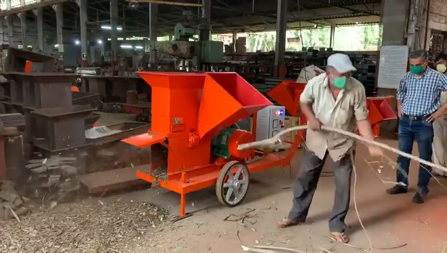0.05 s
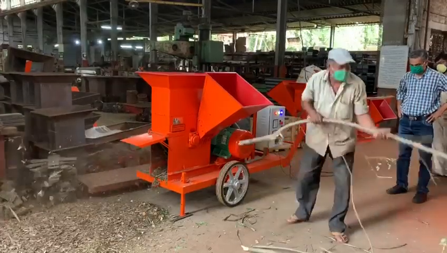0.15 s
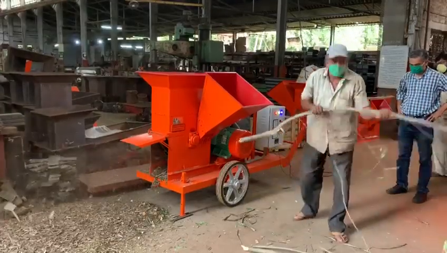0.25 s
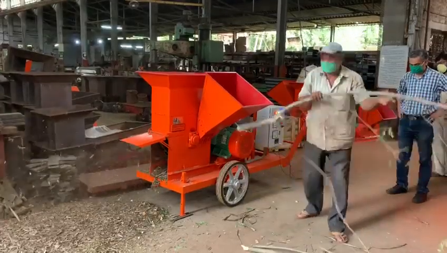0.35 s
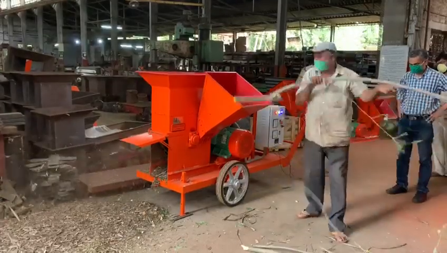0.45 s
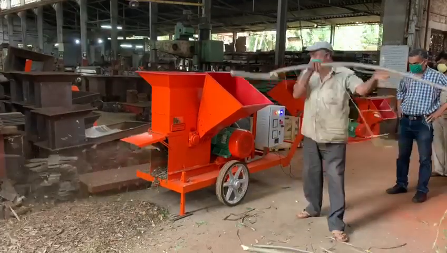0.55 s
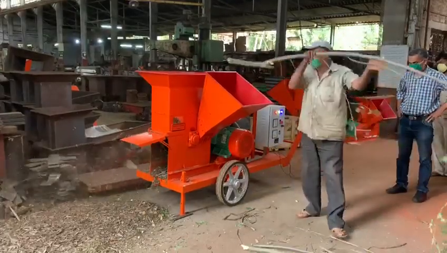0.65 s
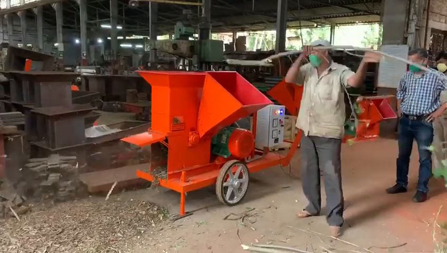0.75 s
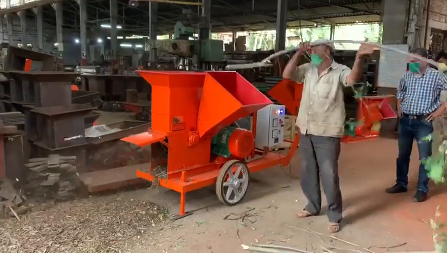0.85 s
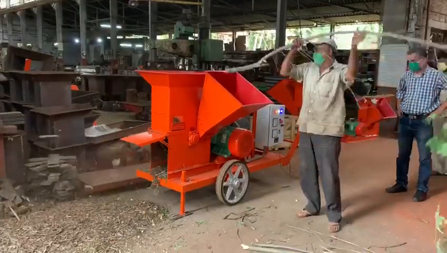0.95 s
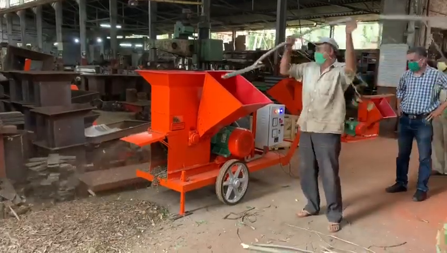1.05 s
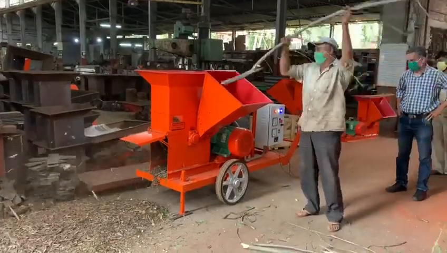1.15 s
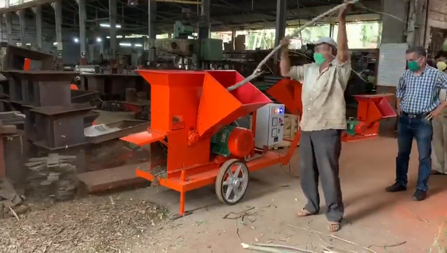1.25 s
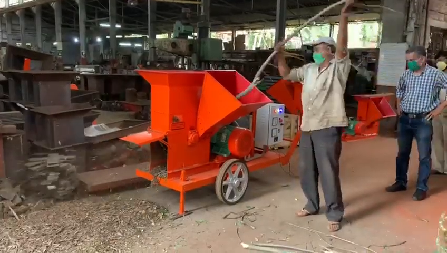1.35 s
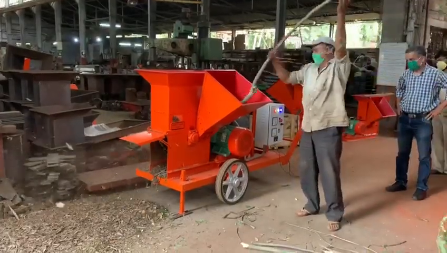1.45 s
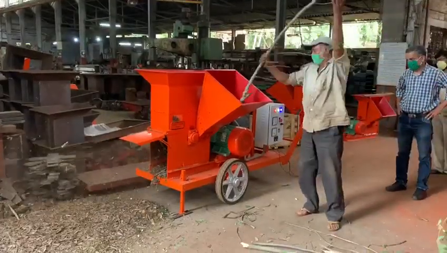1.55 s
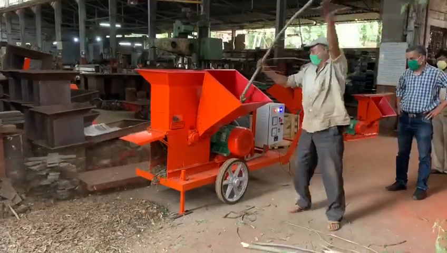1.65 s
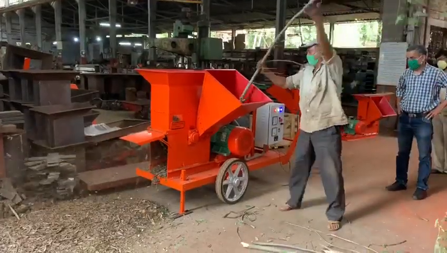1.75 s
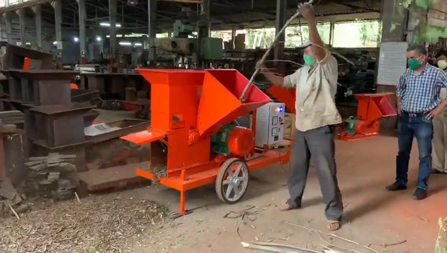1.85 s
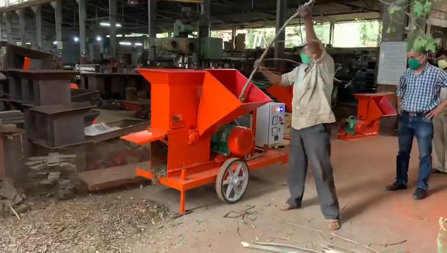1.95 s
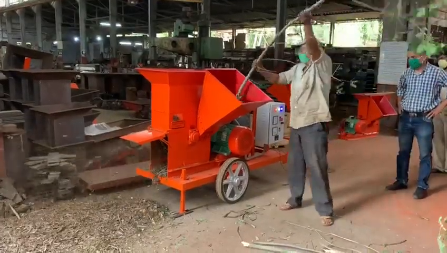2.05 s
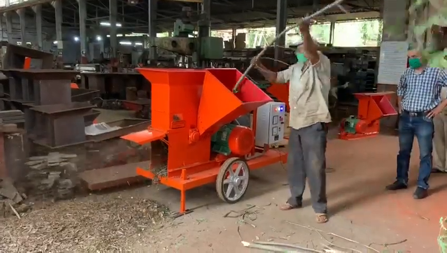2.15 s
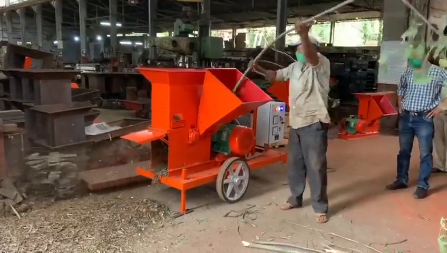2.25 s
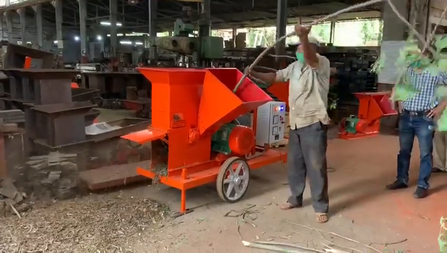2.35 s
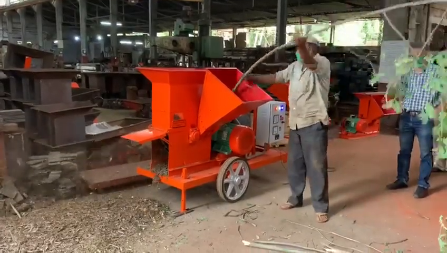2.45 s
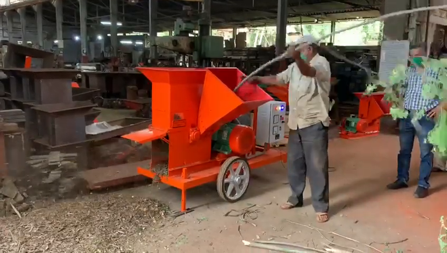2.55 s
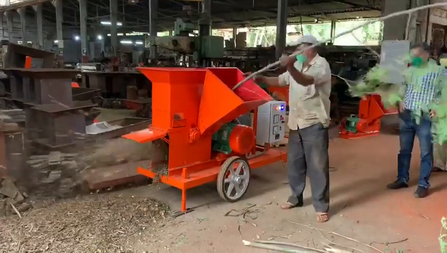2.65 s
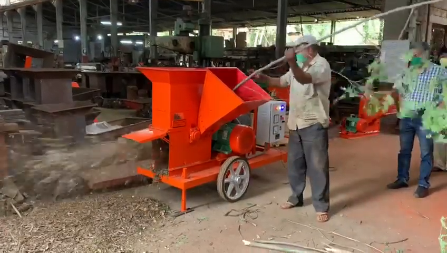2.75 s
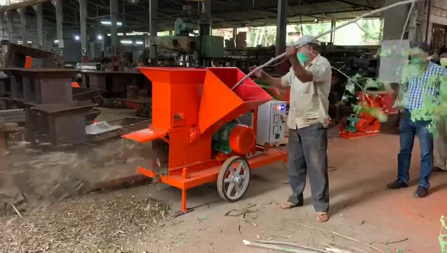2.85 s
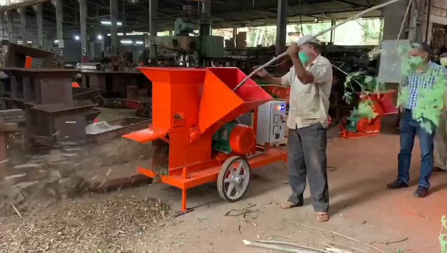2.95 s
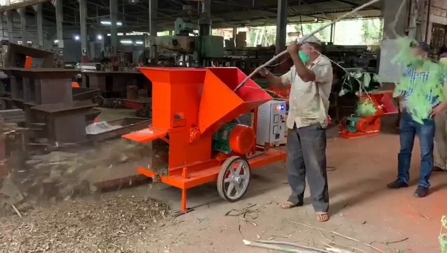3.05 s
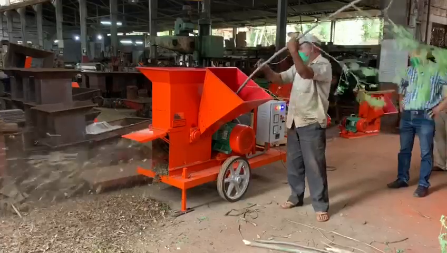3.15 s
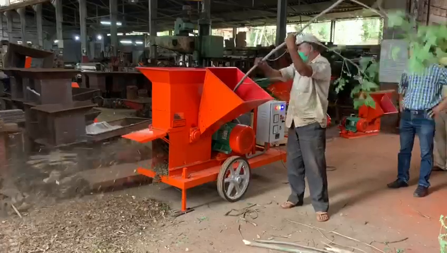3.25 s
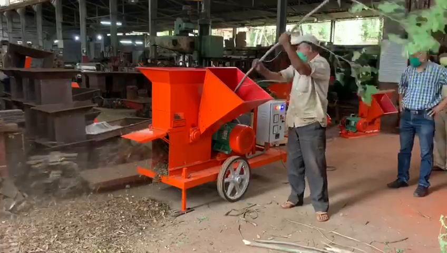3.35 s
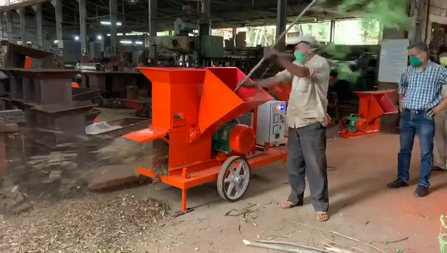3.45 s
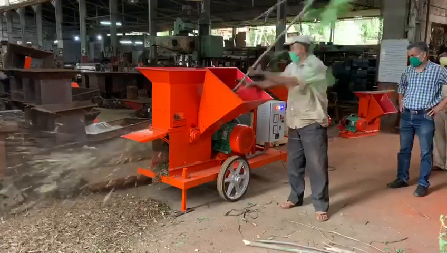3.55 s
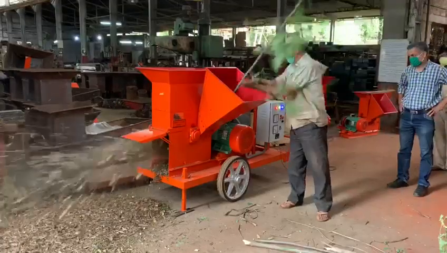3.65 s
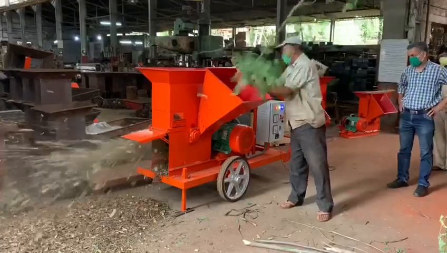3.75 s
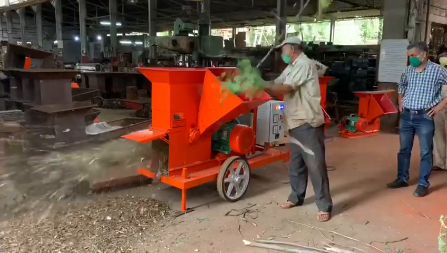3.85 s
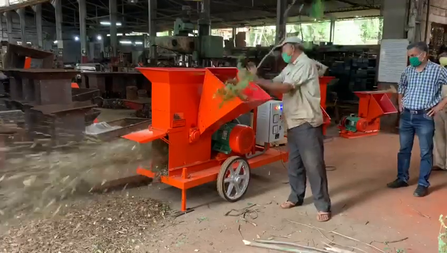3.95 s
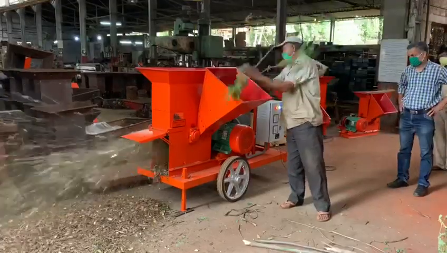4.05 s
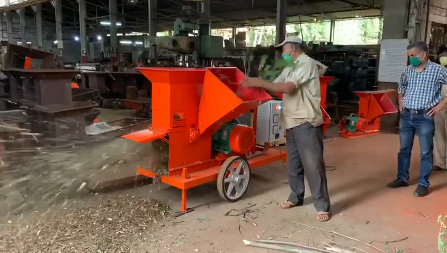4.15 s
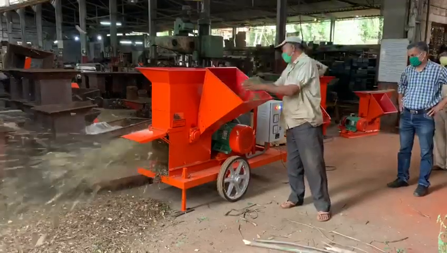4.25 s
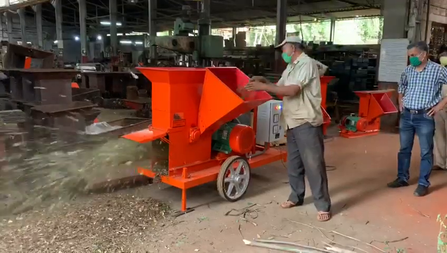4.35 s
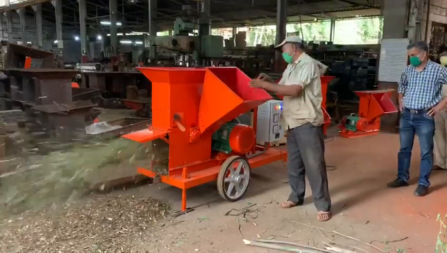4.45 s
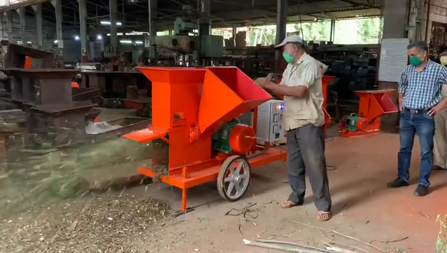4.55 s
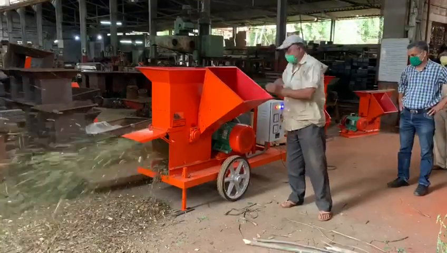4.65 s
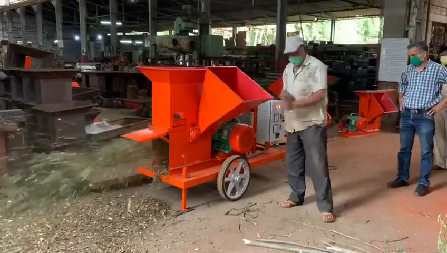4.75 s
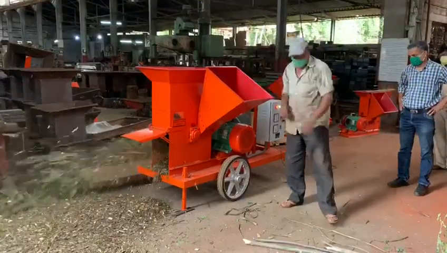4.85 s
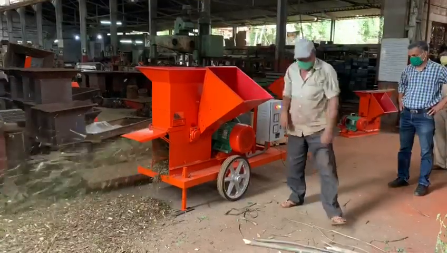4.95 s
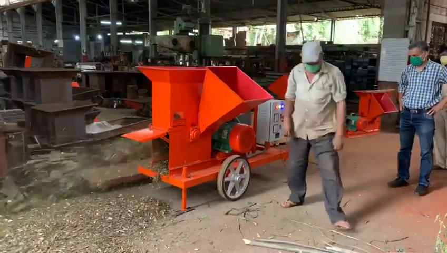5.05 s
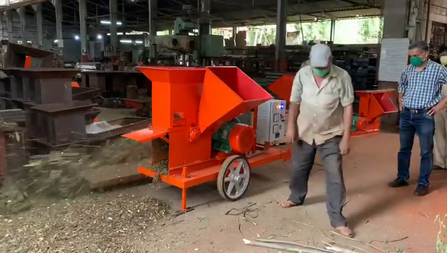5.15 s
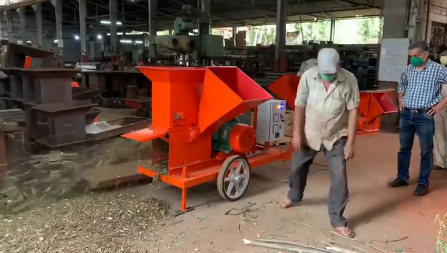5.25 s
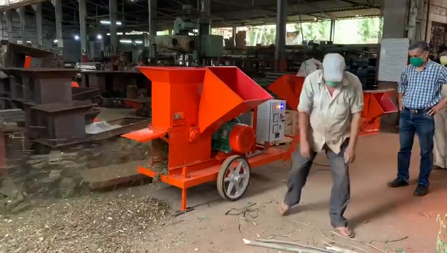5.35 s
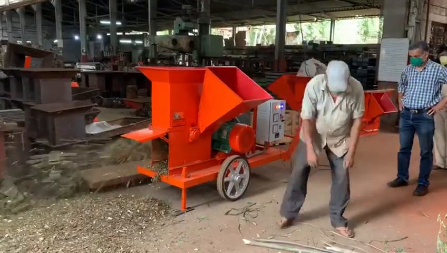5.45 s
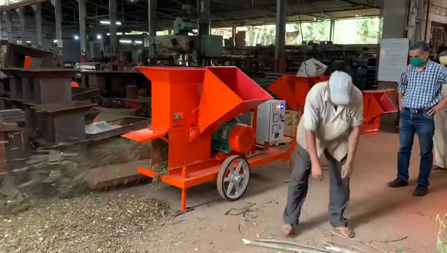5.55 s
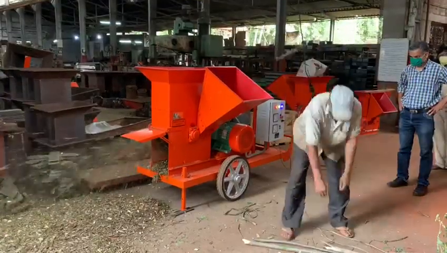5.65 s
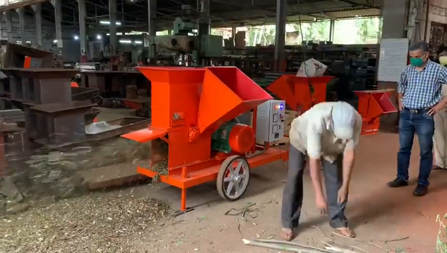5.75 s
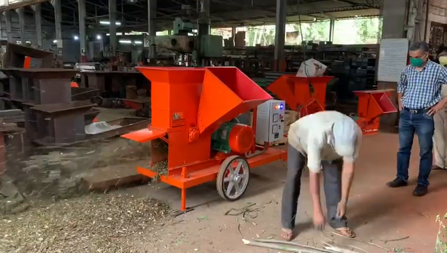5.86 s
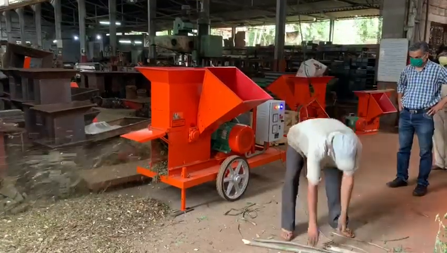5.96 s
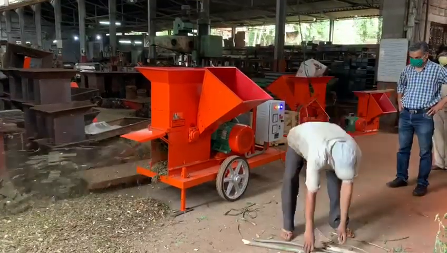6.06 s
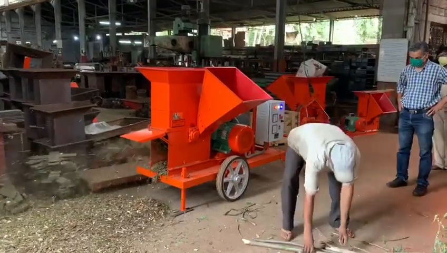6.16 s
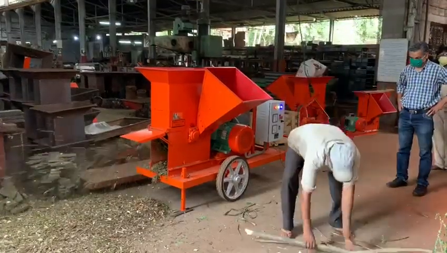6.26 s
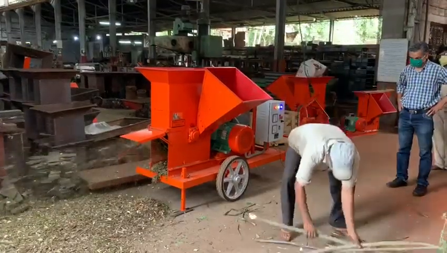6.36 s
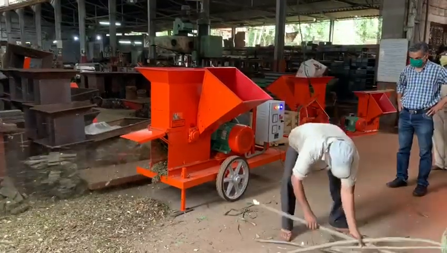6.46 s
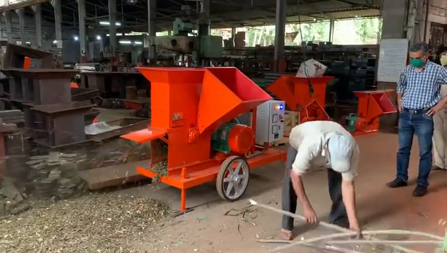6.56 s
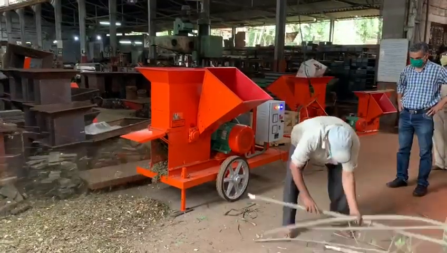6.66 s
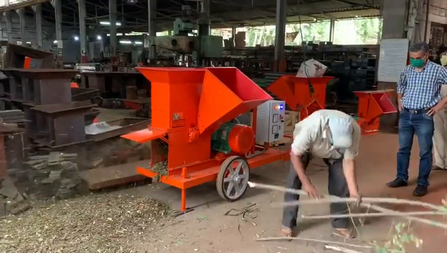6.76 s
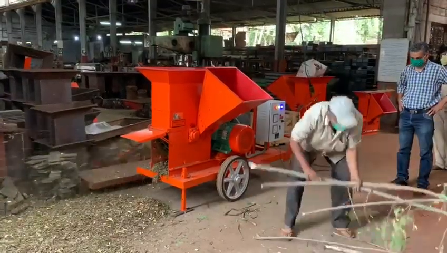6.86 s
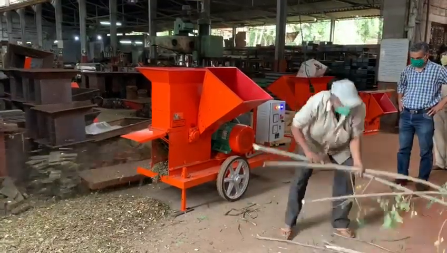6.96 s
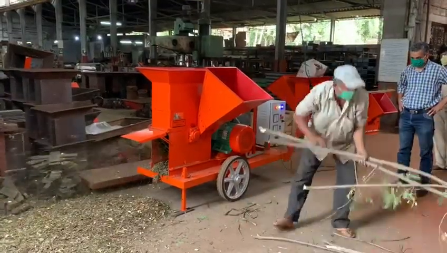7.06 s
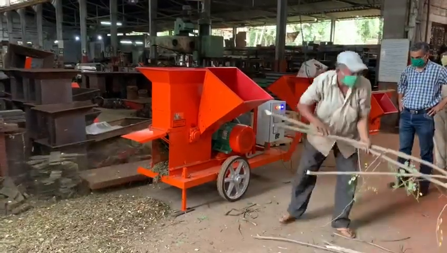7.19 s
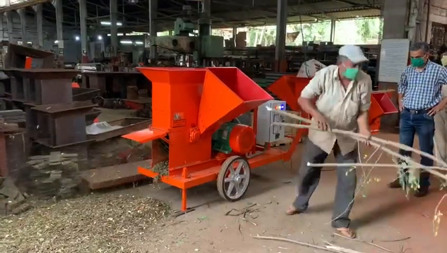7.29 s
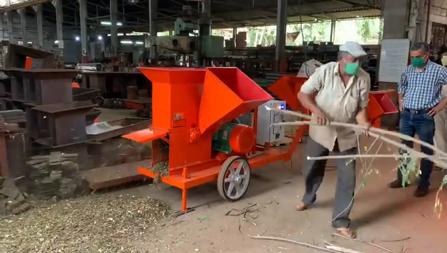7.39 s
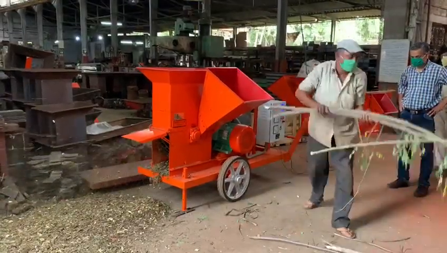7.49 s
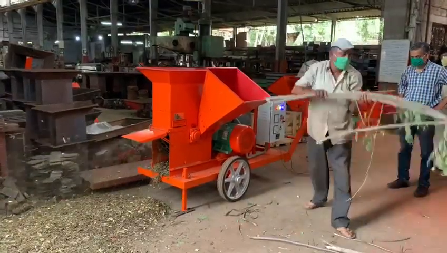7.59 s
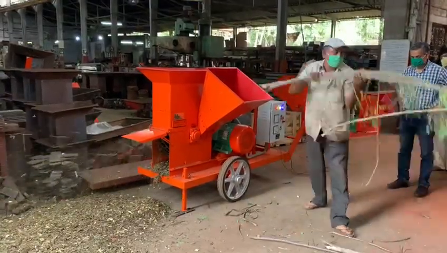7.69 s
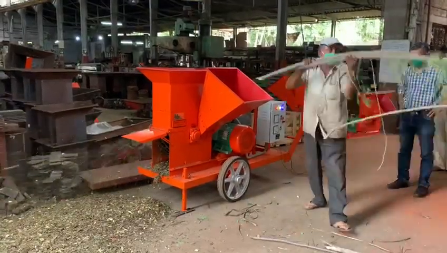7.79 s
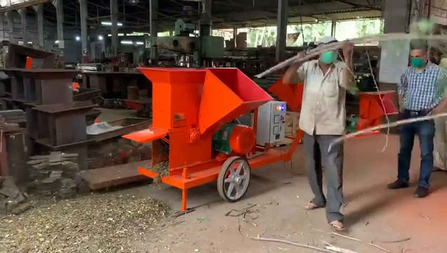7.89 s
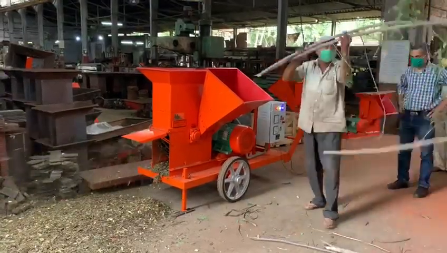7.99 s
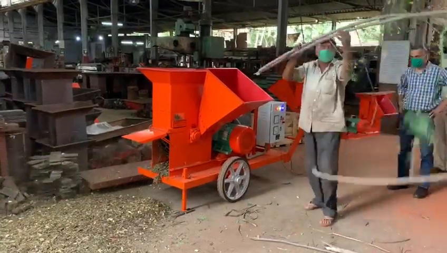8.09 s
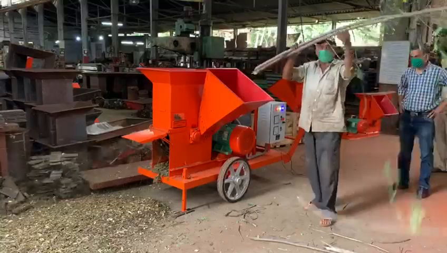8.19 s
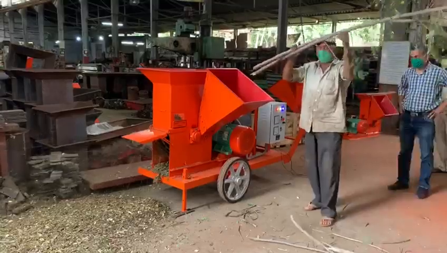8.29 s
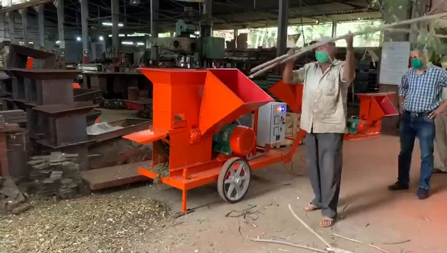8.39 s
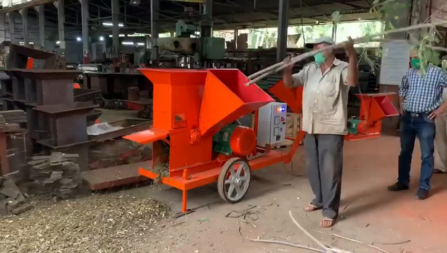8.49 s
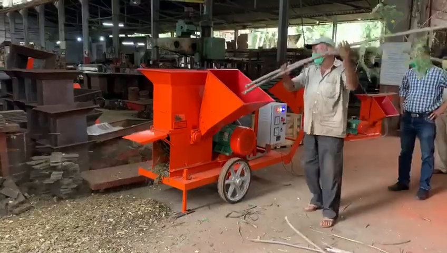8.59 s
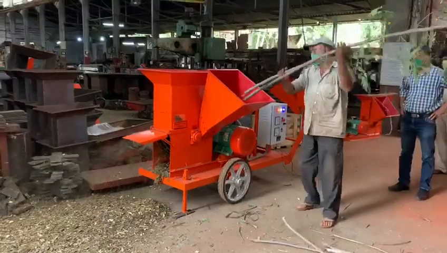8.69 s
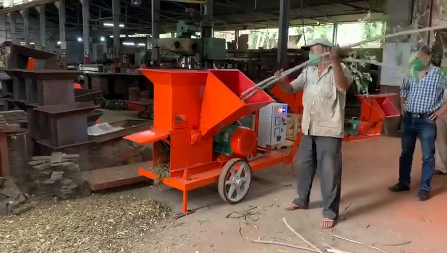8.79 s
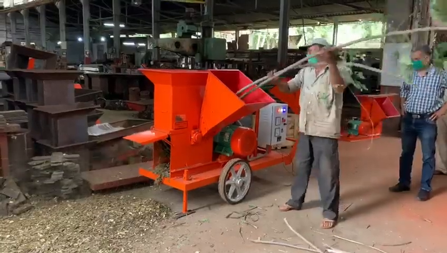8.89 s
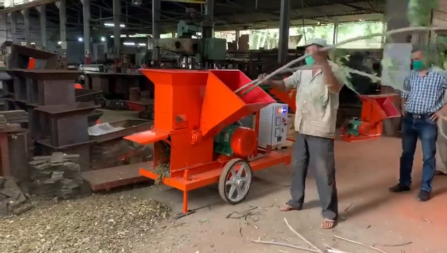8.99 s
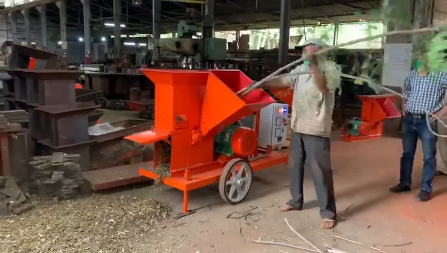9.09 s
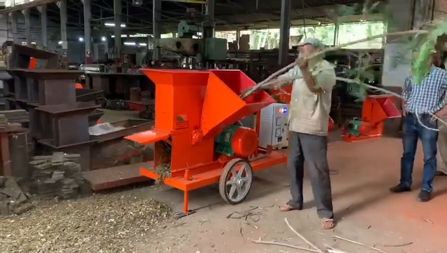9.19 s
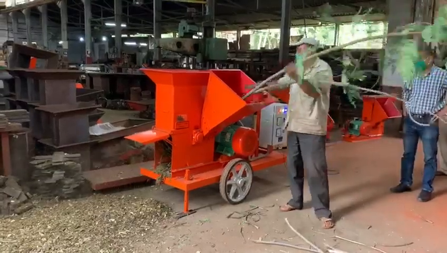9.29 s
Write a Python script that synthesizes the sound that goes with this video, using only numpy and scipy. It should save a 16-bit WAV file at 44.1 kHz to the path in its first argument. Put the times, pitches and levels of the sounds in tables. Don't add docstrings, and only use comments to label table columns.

```python
import sys
import numpy as np
from scipy import signal
from scipy.fft import rfft, irfft, next_fast_len
from scipy.io import wavfile
from scipy.ndimage import uniform_filter1d, map_coordinates

SR = 44100
rng = np.random.default_rng(int(sys.argv[2]) if len(sys.argv) > 2 else 0)


def store_wav(level_fs):
    pcm = np.round(np.clip(np.atleast_2d(level_fs), -1, 1) * 32767)
    wavfile.write(sys.argv[1], SR, pcm.T.astype(np.int16))


def to_linear_factor(level_db):
    exponent = np.asarray(level_db, float) / 20
    return 10 ** exponent


N = 411453
IDLE_HZ = 115.7

# (time [s], rate [Hz])
KNIFE_RATE = [(2.5, 115.72), (2.7, 114.71), (2.82, 113.32), (2.94, 114.45), (3.18, 115.17), (3.42, 115.61),
              (3.54, 114.07), (3.66, 112.96), (3.85, 112.86), (4.14, 113.45), (4.26, 113.85), (4.62, 114.5),
              (4.86, 115.25), (5.1, 115.55), (5.4, 115.63), (8.4, 115.77)]
# (shaft order [1], idling level [dB], loaded level [dB], left over right [dB], right lead [rad])
LOW_ORDERS = [(2, -26, -31, 0, 0), (4, 0, -1.5, 2, .1), (5, -9.5, -6, 0, 0), (7, -19, -17, 1, .1),
              (8, -1, -14, 3, .2), (10, -20, -11, -2, -.3), (12, -13, -6, 0, -1.5),
              (14, -11, -26, -10, -.9), (16, -6, -14, -5, .3), (17, -21, -26, 1, .2),
              (18, -22, -29, 1, -.6), (20, -7, -11, 7, 1.7), (24, -10, -5, 6, 2.2), (25, -23, -18, 1, .4),
              (28, -13, -11, -9, -.4), (32, -17, -4, -1, -1.5)]
# (shaft order [1], idling level [dB], loaded level [dB], left over right [dB], right lead [rad])
HIGH_ORDERS = [(36, -6, -18, -2, .6), (40, -19, -16, -4, -2.4), (44, -12, -24, -2, .7),
               (45, -25, -21, -3, .1), (48, -20, -22, -3, .4), (52, -12, -22, 6, -1.5),
               (56, -14, -18, -3, 2.2), (60, -17, -28, 4, -1), (64, -15, -23, -2, -2.9),
               (68, -18, -23, -3, -1.8), (76, -17, -29, -3, 2.3), (88, -24, -27, 1, -.6),
               (92, -17, -28, 0, -.8), (96, -26, -26, 0, -.5), (108, -23, -29, -2, -.7),
               (112, -20, -29, -1, -2), (128, -26, -28, 1, -1.7), (144, -28, -31, -1, -1.8)]
# (time [s], hum [dB], chip flow in the chute [dB])
MACHINE_LEVELS = [(0.0, -29.5, -42), (0.25, -29, -36.5), (0.7, -28, -41), (2.0, -27, -34.5),
                  (2.55, -26.5, -36), (2.75, -29, -36.5), (3.09, -27.5, -34.5), (3.46, -30, -34.5),
                  (4.03, -30.5, -39.5), (4.34, -31.5, -41), (4.68, -30.5, -41), (5.02, -30, -38),
                  (5.33, -32, -38), (5.61, -30, -34.5), (6.0, -30, -36.5), (7.5, -28.5, -36),
                  (8.0, -28, -38.5), (9.33, -27.5, -38.5)]


def unit(x):
    return x / np.sqrt(np.mean(x ** 2) + 1e-20)


def along(points, hz):
    f, v = np.transpose(points)
    return np.interp(np.log(hz + 1), np.log(f + 1), v)


def curves(rows, outside=None):
    s, *cols = np.transpose(rows)
    return [np.interp(np.arange(N) / SR, s, c, outside, outside) for c in cols]


def wobble(rate):
    return map_coordinates(rng.standard_normal(int(N * rate / SR) + 4), [np.arange(N) * rate / SR])


def filtered(x, response):
    m = next_fast_len(N + 8192)
    return irfft(rfft(x, m) * response(np.fft.rfftfreq(m, 1 / SR)), m)[..., :N]


def coloured(x, points):
    return unit(filtered(x, lambda hz: to_linear_factor(along(points, hz))))


def resonances(modes):
    def response(f):
        total = 0
        for k, (centre, width, db) in enumerate(modes):
            damping = 1j * f * width
            total = total + (-1) ** k * to_linear_factor(db) * damping / (centre ** 2 - f * f + damping)
        return total
    return response


def noise(patchy_db):
    z = signal.stft(rng.standard_normal((2, N)), nperseg=512)[2]
    field = uniform_filter1d(rng.standard_normal(z.shape[1:]), size=6, axis=0)
    field = uniform_filter1d(field, size=10, axis=1)
    return unit(signal.istft(z * to_linear_factor(patchy_db * unit(field)), nperseg=512)[1][:, :N])


def grit(rate, spread_db, t60):
    hits = (rng.random(N) < rate / SR) * to_linear_factor(spread_db * rng.standard_exponential(N))
    return unit(signal.lfilter([1], [1, -to_linear_factor(-60 / (t60 * SR))], hits))


def swell(s, db, length, attack, t60, fading=0):
    t = np.arange(N) / SR - s
    held = np.clip(t - attack, 0, length)
    released = np.clip(t - attack - length, 0, 2)
    return np.clip(t / attack, 0, 1) * to_linear_factor(db - fading * held - 60 * released / t60)


def knife_phase():
    return 2 * np.pi * np.cumsum(curves(KNIFE_RATE)[0]) / SR


def speed_lost():
    return IDLE_HZ - curves(KNIFE_RATE)[0]


def rotor():
    sag_from_hz, sag_over_hz = 2, 2
    sag = speed_lost()
    shaft = knife_phase() / 4
    out = np.zeros((2, N))
    for order, idle_db, loaded_db, pan_db, lead in LOW_ORDERS + HIGH_ORDERS:
        tone_sag = sag * (order if order > 7 else 16) / 4
        load = np.clip((tone_sag - sag_from_hz) / sag_over_hz, 0, 1)
        unsteady = min(order / 55, .9)
        flutter_db = unsteady * (1.1 * wobble(4) + 2.4 * wobble(18))
        size = to_linear_factor(idle_db + load * (loaded_db - idle_db) + flutter_db)
        phase = order * shaft + rng.uniform(0, 2 * np.pi) + .5 * unsteady * wobble(12)
        sides = to_linear_factor([pan_db / 2, -pan_db / 2])
        tone = np.array([sides[0] * np.sin(phase), sides[1] * np.sin(phase + lead)])
        out += size * tone / np.sqrt(np.mean(sides ** 2) / 2)
    return out * to_linear_factor(curves(MACHINE_LEVELS)[0] + 0.05)


def revolution():
    even_db, knife_db, scatter_db, loaded_db = 4, 4, 4, -6
    # (frequency [Hz], level [dB])
    comb_colour = [(700, -45), (1500, -31), (3000, -32), (4500, -36), (6500, -39), (7500, -60)]
    k = np.arange(2049)
    db = along(comb_colour, k * IDLE_HZ / 4) + even_db * (k % 2 == 0) + knife_db * (k % 4 == 0)
    db = db + scatter_db * rng.standard_normal(len(k))
    db[[round(row[0]) for row in LOW_ORDERS + HIGH_ORDERS]] = -120
    spectrum = to_linear_factor(db) * np.exp(2j * np.pi * rng.random((2, len(k))))
    turns = irfft(spectrum) * 4096 / np.sqrt(2)
    place = (knife_phase() / (8 * np.pi) + .0004 * wobble(9)) % 1 * 4096
    pair = np.array([np.interp(place, np.arange(4096), turn) for turn in turns])
    return pair * to_linear_factor(curves(MACHINE_LEVELS)[0] + loaded_db * np.clip(speed_lost(), 0, 1))


def air():
    # (frequency [Hz], density [dB/Hz])
    draught_colour = [(20, -21), (45, -12.5), (100, -4.5), (250, 1.5), (450, -4.5), (1000, -7), (1700, -11),
                      (2500, -10.5), (4000, -12.5), (6000, -23.5), (12500, -62)]
    # (frequency [Hz], density [dB/Hz])
    hiss_colour = [(200, -51), (1500, -35), (4000, 2), (5500, -2), (7000, 0), (9000, 2.3), (12500, -4)]
    hum_db, hiss_db = curves(MACHINE_LEVELS)
    throb = 1 + 0.26 * np.cos(knife_phase())
    roar = coloured(throb * noise(patchy_db=1.06), draught_colour)
    rumble = filtered(roar, lambda hz: 1 / (1 + (hz / 70) ** 4))
    faded_db = -6 * np.clip(speed_lost(), 0, 1)
    roar = roar + rumble * (to_linear_factor(faded_db) - 1)
    trickle = 0.63 + 0.34 * grit(rate=87, spread_db=3.5, t60=0.11)
    hiss = coloured(trickle * noise(patchy_db=.7), hiss_colour)
    roar_gain = to_linear_factor(hum_db - 1.0 + 0.084 * wobble(1.9))
    hiss_gain = to_linear_factor(hiss_db + 3.0 + 0.59 * wobble(9.3))
    return roar_gain * roar + hiss_gain * hiss


def casing(x):
    # (centre [Hz], width [Hz], lift [dB])
    housing_bands = [(1908, 65, -5), (3290, 65, -5), (4040, 50, -7), (4683, 50, -6), (5130, 230, -2.5),
                     (5460, 96, 3), (5830, 150, -3.5), (6180, 73, 4.5)]
    return filtered(x, lambda f: to_linear_factor(sum(db * np.exp(-((f - hz) / width) ** 2) for hz, width, db in housing_bands)))


def wood():
    attack_s, t60_s = 0.019, 0.21
    # (time [s], force [dB], blows over splinters [dB])
    feed = [
        (2.58, -27.5, -6),
        (2.8, -31, 4.5),
        (3.0, -33.5, 2.5),
        (3.4, -38.5, 0),
        (3.5, -30.5, -8),
        (3.8, -28, -1),
        (4.15, -28.5, -4.5),
        (4.65, -33, -4.5),
        (4.85, -37, -2),
    ]
    # (time [s], force [dB], held [s], blows over splinters [dB], hopper over anvil [dB])
    bites = [(2.62, -29.5, .025, 15, -15), (2.678, -27.5, 0.01, -11.5, -2.5), (2.712, -31, 0.03, 4.5, 5.5),
             (2.838, -41, 0.03, -7.5, -6), (3.136, -45, 0.0063, 6, 7), (3.17, -57, .01, 9, 1),
             (3.448, -25, 0.078, -5.5, -3), (3.529, -31, 0.024, 3, 0.5), (3.611, -30.5, 0.058, -7, -2),
             (3.7, -44, 0.015, 3, 2), (3.95, -51, .04, -14, 12), (4.311, -38.5, .02, 0, -10),
             (4.5, -36.5, 0.038, -11, -12), (4.56, -42, 0.027, -7, -10), (4.663, -42, 0.016, -19, 0),
             (4.918, -35, 0.016, -7, -3), (5.07, -46, 0.026, -18, 0)]
    force_db, blows_db = curves(feed, outside=-85)
    splinter = to_linear_factor(force_db)
    anvil = to_linear_factor(force_db + blows_db)
    hopper = anvil * to_linear_factor(-6.5)
    for s, db, held, over_db, hopper_db in bites:
        grab = swell(s, db, held, attack_s, t60_s)
        splinter = splinter + grab
        anvil = anvil + grab * to_linear_factor(over_db)
        hopper = hopper + grab * to_linear_factor(over_db + hopper_db)
    return hopper, anvil, splinter


def branch():
    # (centre [Hz], width [Hz], level [dB])
    hopper_modes = [(311, 170, 0.5), (387, 57, 2)]
    # (centre [Hz], width [Hz], level [dB])
    anvil_modes = [(470, 130, 0), (915, 160, 1), (1430, 250, -13)]
    # (frequency [Hz], density [dB/Hz])
    crunch_colour = [(60, -45), (500, -12.5), (1000, -3), (1800, -3.5), (2600, 1.5), (3600, -7),
                     (6000, -23)]
    # (frequency [Hz], density [dB/Hz])
    spray_colour = [(200, -56), (1800, -23.5), (3200, 1), (4500, -1.5), (6000, -4), (9000, -4.5),
                    (12500, -7)]
    hopper, anvil, splinter = wood()
    turns = knife_phase() / (2 * np.pi)
    strength = to_linear_factor(2.3 * rng.standard_normal(int(turns[-1]) + 1))[turns.astype(int)]
    bite = strength * np.exp(-3 * (turns % 1))
    boom = unit(filtered((0.36 + bite) * noise(patchy_db=2.0), resonances(hopper_modes)))
    knock = unit(filtered((1.5 + bite) * noise(patchy_db=4.0), resonances(anvil_modes)))
    blows = unit(filtered(bite, resonances(anvil_modes)))
    knock = unit(knock + .9 * blows * [[1], [.3]])
    splinters = .7 + 0.42 * bite + 0.23 * grit(rate=840, spread_db=3.5, t60=0.028)
    crunch = coloured(splinters * noise(patchy_db=1.5), crunch_colour)
    spray = coloured(splinters * noise(patchy_db=1.5), spray_colour)
    thumps = filtered(hopper * boom + anvil * knock, lambda hz: hz ** 4 / (hz ** 4 + 130 ** 4))
    return thumps + splinter * to_linear_factor(1.5) * (crunch + to_linear_factor(1.5) * spray)


def slide():
    attack_s, t60_s = 0.028, 0.33
    # (time [s], level [dB], length [s])
    scrapes = [
        (1.45, -38, 1.5),
        (1.453, -26, 0.022),
        (1.539, -18, 0.011),
        (1.686, -26, 0.0091),
        (1.786, -20.5, 0.023),
        (2.506, -23.5, 0.046),
        (3.11, -27.5, 0.39),
        (4.553, -35, .1),
        (4.659, -19.5, 0.042),
    ]
    bark = unit(filtered(noise(patchy_db=3.0), resonances([(1638, 600, 0.0), (3150, 3300, -5.5)])))
    return to_linear_factor(-8.0) * sum(swell(*row, attack_s, t60_s) for row in scrapes) * bark


def chips():
    fall_ms, rise_ms = 14, 3
    # (time [s], peak level [dB])
    strikes = [(0.357, -16), (1.3474, -15.5), (1.6719, -13), (1.9694, -20), (2.5296, -18.5), (2.6299, -25),
               (3.0116, -23), (3.1014, -22), (3.137, -14), (3.2605, -21), (3.3323, -19.5), (3.355, -14.5),
               (3.467, -18), (3.6124, -14), (4.1071, -18), (4.1639, -28), (4.2752, -19), (4.5236, -11.5),
               (5.072, -19), (5.462, -14.5), (5.7387, -20), (6.191, -21), (6.8184, -20), (6.838, -21),
               (7.06, -18), (7.207, -18), (7.3582, -36), (7.5043, -23), (8.228, -20), (8.399, -10)]
    # (frequency [Hz], density [dB/Hz])
    tick_colour = [(1500, -29.5), (4000, -3.5), (5500, 0), (7000, 8.5), (9000, 0.5), (12500, -3)]
    env = np.zeros(N + SR)
    ms = np.arange(SR // 10) / SR * 1000
    shape = np.exp(-(ms / fall_ms) ** 2) * (1 - np.exp(-ms / rise_ms))
    for s, db in strikes:
        env[round(s * SR):][:len(ms)] += to_linear_factor(db - 3.5) * shape
    return env[:N] * coloured(noise(patchy_db=1), tick_colour)


def rasp():
    attack_s, t60_s = 0.046, 0.3
    # (time [s], level [dB], length [s], fading [dB/s], upper resonances [dB])
    strokes = [
        (0.205, -33.5, 0.22, 50, 3),
        (1.012, -37, 0.23, 17, 3),
        (1.754, -35, 0.22, 46, 1),
        (5.961, -34.5, 0.42, 45, 1),
        (6.756, -35.5, 0.25, 34, 2),
        (7.94, -35.5, 0.14, -11, -5),
        (8.709, -34, 0.18, 41, 1.5),
    ]
    # (centre [Hz], width [Hz], level [dB])
    part_modes = [(2485, 70.3, 0), (3107, 110, -4.5), (3690, 53, -3), (4507, 91, -4.5)]
    teeth = to_linear_factor(1.6 * wobble(60)) * noise(patchy_db=.6)
    lowest = unit(filtered(teeth, lambda f: resonances(part_modes[:1])(f) ** 2))
    upper = unit(filtered(teeth, lambda f: resonances(part_modes[1:])(f) ** 2))
    lowest_gain, upper_gain = 0, 0
    for s, db, length, fading, upper_db in strokes:
        gain = swell(s, db, length, attack_s, t60_s, fading)
        lowest_gain = lowest_gain + gain
        upper_gain = upper_gain + gain * to_linear_factor(upper_db)
    return to_linear_factor(4.5) * (lowest_gain * lowest + to_linear_factor(-4) * upper_gain * upper)


def microphones(pair):
    # (frequency [Hz], likeness [0-1])
    likeness = [(40, .97), (200, .95), (300, .85), (600, .45), (2000, .3), (3600, .45), (5000, .2),
                (6100, .45), (6700, .8), (7000, .97), (7500, .97), (8000, .7), (8700, .95), (9600, .97),
                (10500, .65), (11200, .97)]
    # (frequency [Hz], lead [rad])
    right_lead = [(0, 0), (1300, .6), (2300, 2.2), (4000, 3.5), (5800, 2.0), (6500, 2.7), (6900, 3.05),
                  (7500, 3.35), (7750, 4.2), (8450, 5.5), (8750, 6.1), (10100, 6.6), (11000, 9.1),
                  (13000, 9.5)]

    def mixing(hz):
        turn = np.arccos(np.clip(along(likeness, hz), 0, 1)) / 2
        return np.array([np.cos(turn), np.sin(turn)])

    def ahead(hz):
        return np.exp(.5j * np.interp(hz, *np.transpose(right_lead)) * np.array([[-1], [1]]))

    shared, apart = filtered(pair, mixing)
    return filtered(np.array([shared + apart, shared - apart]), ahead)


def scene():
    machine = casing(air() + revolution())
    return rotor() + microphones(machine + branch() + slide() + chips() + rasp())


def top_cut(x):
    return signal.sosfilt(signal.butter(12, 11810, fs=SR, output="sos"), x)


def record(dry):
    mix = dry / (1 + abs(dry / .85) ** 4) ** .25
    return top_cut(mix)


dry = scene()
out = record(dry)
store_wav(out)
```